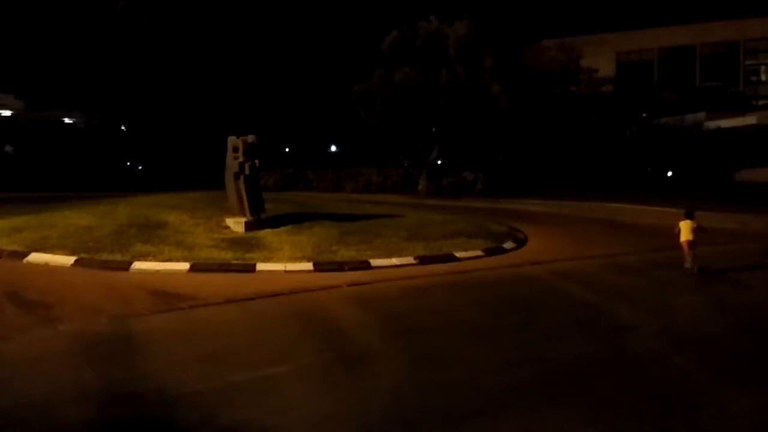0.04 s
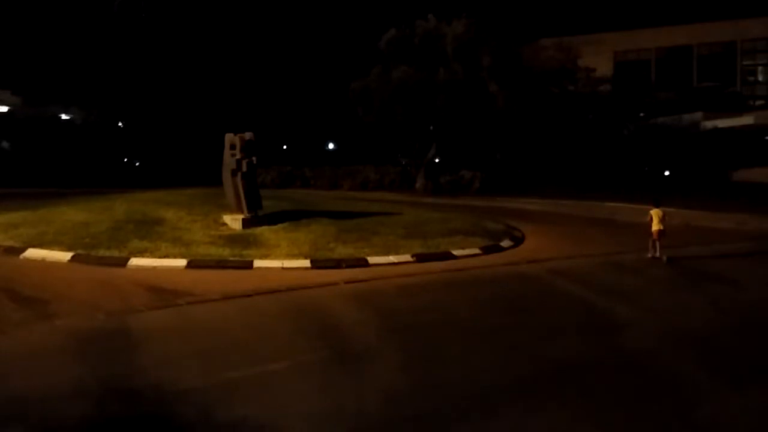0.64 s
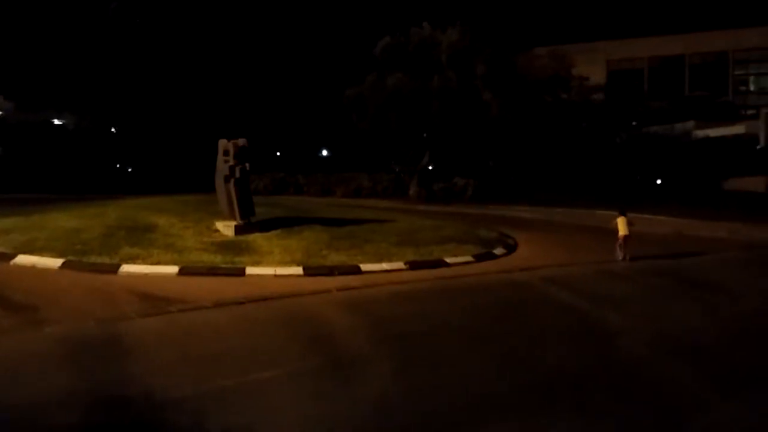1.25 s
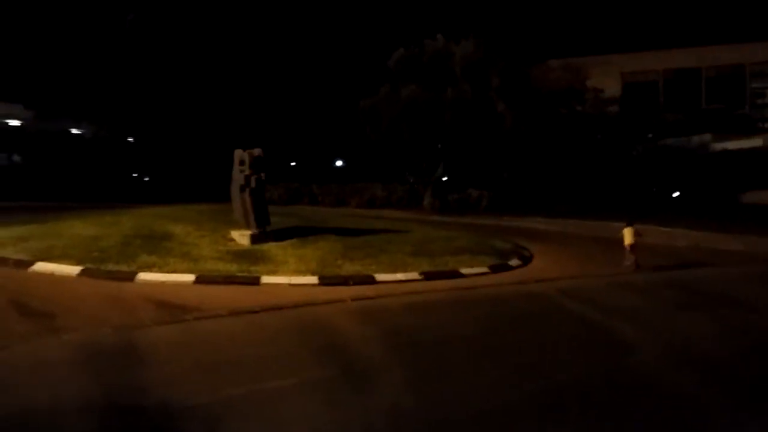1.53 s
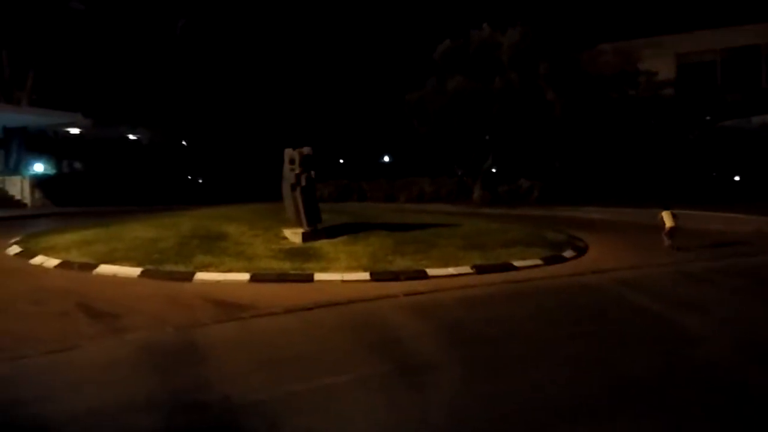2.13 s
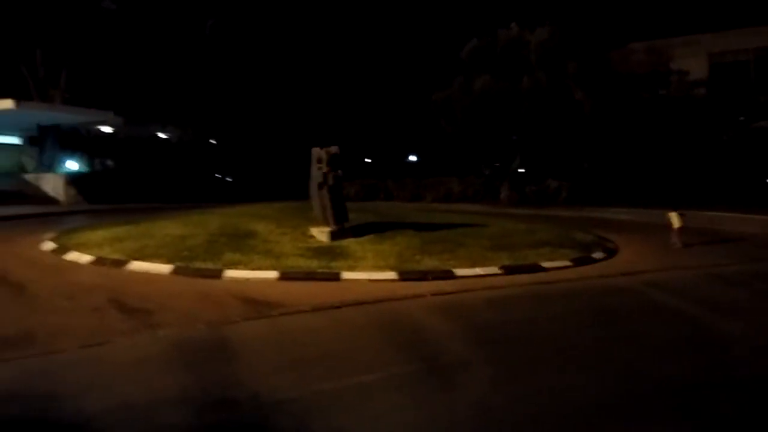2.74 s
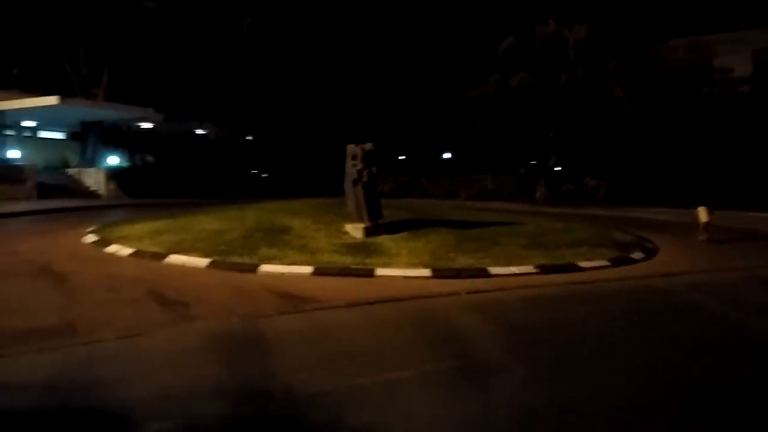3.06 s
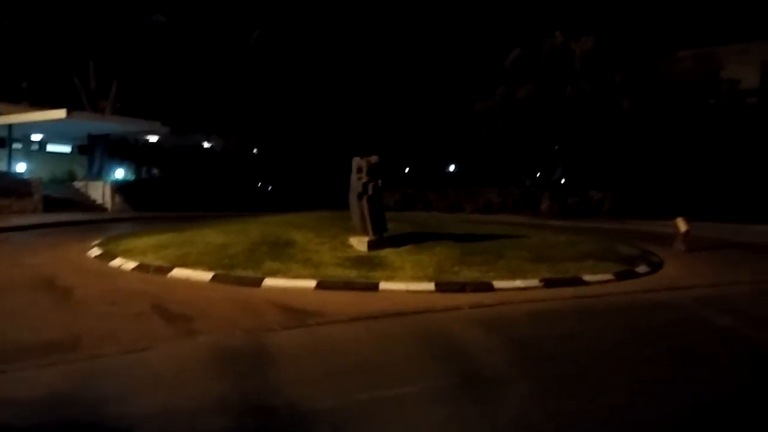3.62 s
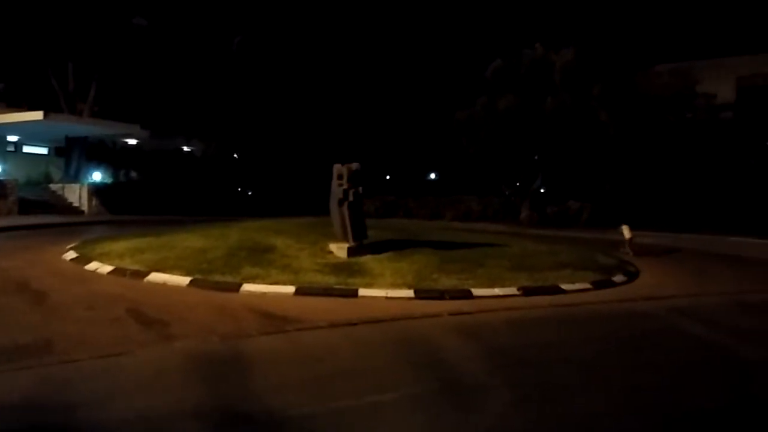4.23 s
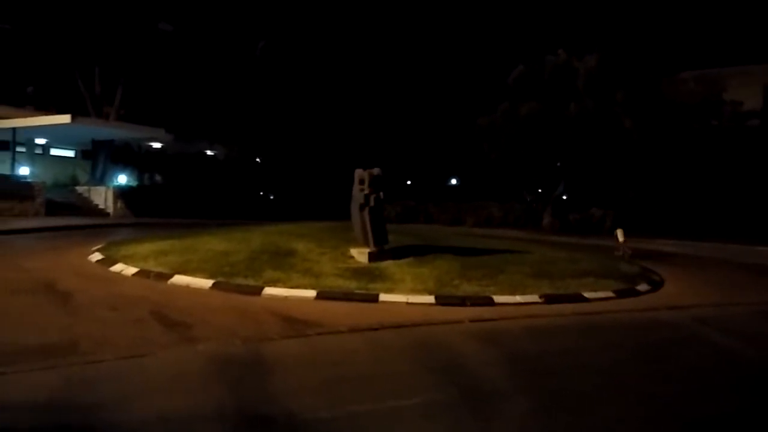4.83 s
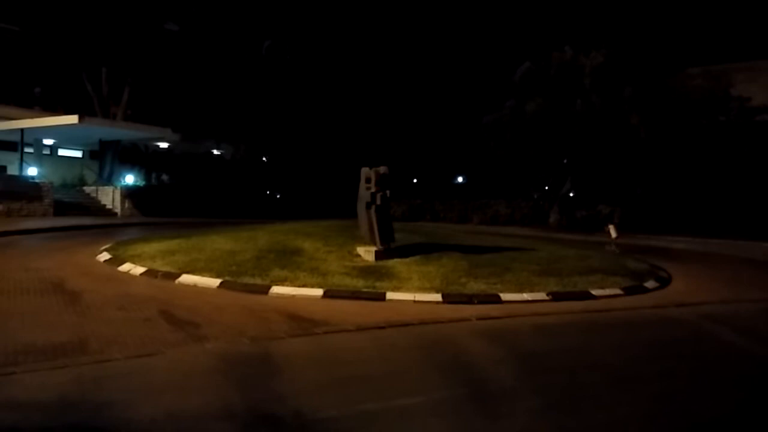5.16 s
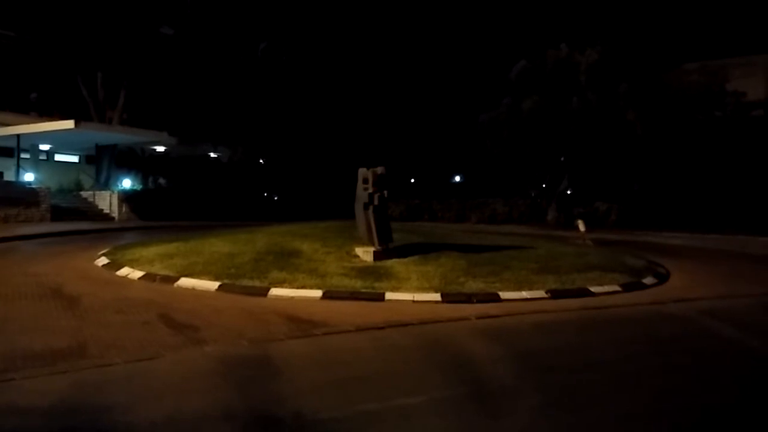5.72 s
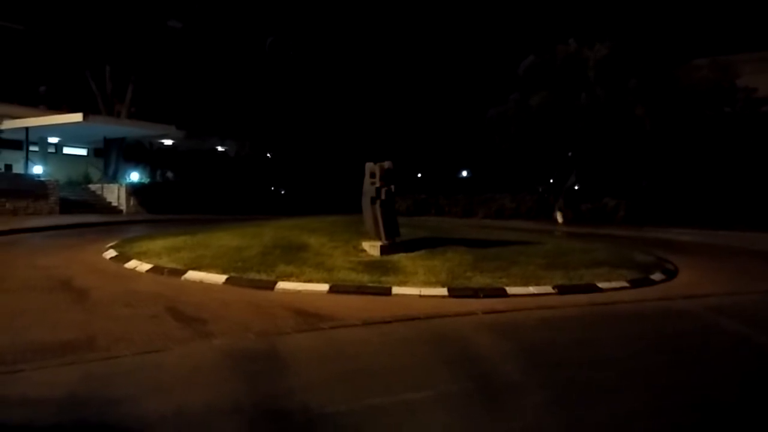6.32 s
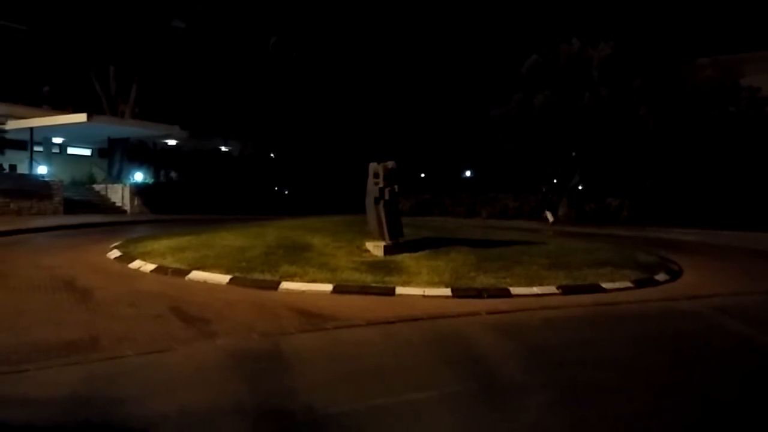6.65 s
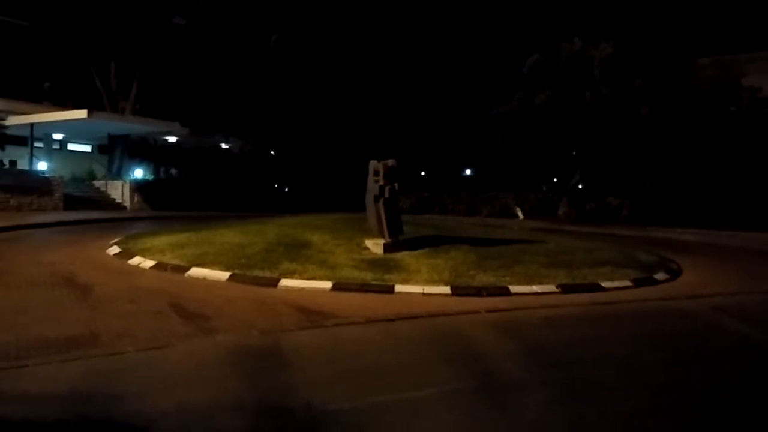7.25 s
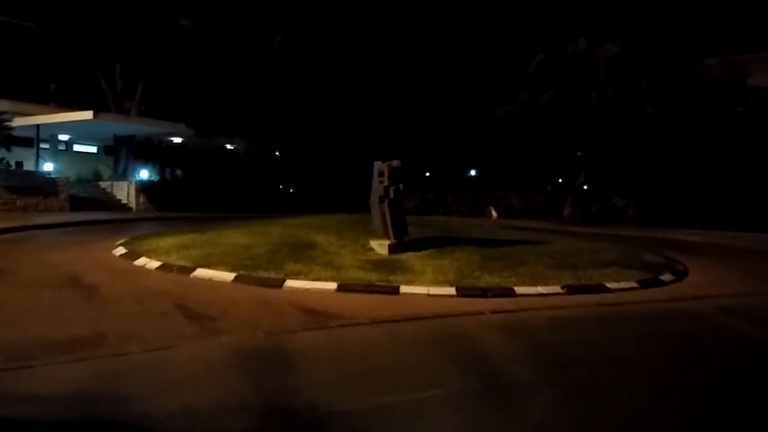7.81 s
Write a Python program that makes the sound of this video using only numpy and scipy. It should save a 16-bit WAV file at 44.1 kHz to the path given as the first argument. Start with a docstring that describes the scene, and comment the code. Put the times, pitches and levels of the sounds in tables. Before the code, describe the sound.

Fingers rub and slide on a plastic phone case right by the microphone, with ticks and creaks, over a distant town rumble.

```python
"""An empty roundabout at night, on a hand-held phone with two microphone ports.
Far off, the town rumbles, a building hums on mains harmonics and one motor winds down.
Now and then the bass swells briefly or gives a soft thud.
Right beside the left port, fingers shift on the case: skin slides in tiny slips, snags and lets go,
ringing the plastic shell, which creaks, ticks and clacks. The palm drags on the back."""
import sys
import numpy as np
from scipy import signal
from scipy.fft import rfft, irfft
from scipy.io import wavfile
from scipy.ndimage import map_coordinates

SR = 44100
rng = np.random.default_rng(int(sys.argv[2]) if len(sys.argv) > 2 else 0)


def transcribe(signal):
    """Save signal, clipped to [-1, 1], as a 16-bit WAV file at the path in sys.argv[1]."""
    frames = np.atleast_2d(signal).T
    limited = np.clip(frames, -1, 1)
    pcm = np.round(limited * 32767).astype(np.int16)
    wavfile.write(sys.argv[1], SR, pcm)


N = 356328
TIME = np.arange(N) / SR
FREQ = np.maximum(np.arange(N // 2 + 1) * SR / N, 1)

# Table levels are relative: each source adds its own gain.
# spectrum of the distant town: f/Hz, level/dB
TOWN_COLOUR = [(25, -33), (42, -9.5), (62, 4), (80, -2.5), (106, 7), (135, -2), (220, -7.5), (330, -3.5),
               (550, -10.5), (900, -14), (1400, -20), (3000, -19), (7000, -23.5), (14000, -32)]
# hum lines from the building: f/Hz, level/dB, waver/dB
HUM_LINES = [(100.6, -65.5, 2.8), (104.6, -64.5, 2.8), (150.5, -61, 1.9), (199.7, -59, 1.5),
             (302, -77.5, 4)]
# the far motor winding down: t/s, f/Hz, level/dB
MOTOR_RUNDOWN = [(7.1, 291.6, -100), (7.17, 288, -61), (7.22, 274, -53), (7.33, 251.5, -70),
                 (7.42, 251, -63), (7.57, 246, -62), (7.68, 218, -64), (7.78, 208, -100)]
# brief soft low swells, most near the 100 Hz hum, and a few low thuds: t/s, level/dB, f/Hz
LOW_SWELLS = [(.785, -44.5, 105), (2.17, -47, 104), (2.535, -45, 64.4), (2.86, -41.5, 100.3),
              (3.964, -41, 226), (4.5, -44, 104), (4.762, -47, 70.5), (5.04, -42, 103), (5.7, -44, 102),
              (7.081, -50, 100)]
# the palm drags on the back of the phone: t/s, length/s, level/dB
PALM_DRAGS = [(.617, 0.02, -57), (.85, 0.36, -56), (1.37, 0.11, -51.5), (1.56, 0.012, -53),
              (1.9, 0.2, -59.5), (2.33, 0.37, -57.5), (2.74, 0.42, -58.5), (3.28, 0.44, -60.5),
              (3.7, 0.14, -54), (4.2, 0.41, -66), (6.26, 0.14, -59)]
# spectrum of that drag: f/Hz, level/dB
DRAG_COLOUR = [(40, -53), (150, 7.5), (330, -14.5), (540, 6), (680, -1.5), (800, -6), (1000, 3),
               (1300, -12.5), (2500, -18)]
# a finger bumps the shell: t/s, level/dB, f/Hz, length/s
FINGER_BUMPS = [(0.931, -31, 477, 0.0047), (0.949, -42.5, 447, 0.037), (1.173, -42, 1040, 0.014),
                (1.427, -38, 460, 0.0098), (1.458, -28, 1100, 0.0087), (1.48, -30, 2120, 0.0092),
                (1.585, -43.5, 970, 0.028), (2.967, -41.5, 1300, 0.0075), (5.407, -45.5, 2220, 0.025),
                (7.49, -37, 1510, 0.006), (7.52, -51.5, 1440, 0.11), (7.894, -35.5, 1434, 0.0071)]
# creaks of the seam: t/s, level/dB, length/s
SEAM_CREAKS = [(1.452, -26, 0.0046), (5.023, -30.5, 0.0058), (5.038, -32.5, 0.037), (5.064, -29.5, 0.013),
               (5.402, -35.5, 0.03)]
# lone ticks of the seam: t/s, level/dB
SEAM_TICKS = [(1.458, -24), (5.0695, -13.5), (6.2562, -19.5), (6.808, -30), (6.899, -30)]
# the case springs back: t/s, level/dB, decay/s
CASE_CLACKS = [(7.494, -34, 0.0074), (7.897, -36.5, 0.013)]
# modes rung by a clack: f/Hz, level/dB, share of the decay, left over right/dB
CASE_MODES = [(1450, -8, 0.5, 5), (2248, -8, .4, 2), (3980, -9, 0.4, 12), (4640, -5, 1.0, 15),
              (5820, 3.5, 0.75, 17), (7400, -9, .3, 14), (8950, -6, .3, 12)]
# spectrum of the pressed shell: f/Hz, level/dB
SHELL_COLOUR = [(40, -32), (200, 3.5), (400, -10.5), (560, 1), (780, -12.5), (1000, 3.5), (1280, -5),
                (1600, 6.5), (1950, 1), (2350, 11.5), (2750, 8), (3050, -23), (3500, -6), (5000, -1.5)]
# resonance of the hollow under the fingers: t/s, f/Hz, level/dB
FINGER_HOLLOW = [(1.3, 2328, -7.5), (2.2, 3487, -6), (3.1, 3410, -2), (4.15, 3014, -3), (4.7, 3600, -14),
                 (7.9, 695, -17), (7.95, 1003, 1), (7.975, 2300, -0.5), (8.07, 2590, -13)]
# the skin catches and sings: t/s, level/dB, f/Hz, length/s, left over right/dB
SKIN_CHIRPS = [(0.724, -34, 4350, 0.005, 18), (0.734, -32, 4470, 0.008, 18), (0.785, -30, 5000, 0.0081, 18),
               (1.044, -53.5, 544, 0.1, 0.5), (2.823, -46, 4220, 0.0083, 12),
               (2.843, -43.5, 4930, 0.022, 16), (4.761, -45, 4950, 0.028, 12),
               (6.043, -51, 5300, 0.035, 20), (7.918, -49, 5830, 0.074, 26)]
# the skin snags and lets go: t/s, level/dB, length/s, favoured f/Hz
SKIN_SNAGS = [(.618, -34, 0.0047, 4600), (0.657, -36, .0057, 4800), (.669, -33, .007, 4700),
              (.68, -21, 0.0048, 4700), (0.709, -29, .005, 7200), (.721, -24, .004, 4400),
              (0.733, -20.5, 0.0079, 4900), (0.752, -21, .007, 4870), (0.762, -23, 0.0084, 4750),
              (0.776, -19, 0.0075, 4700), (0.8, -30, 0.0045, 4500), (.819, -41, .003, 5600),
              (0.837, -27, .0054, 5500), (0.857, -29.5, .005, 5800), (.881, -28, .004, 4900),
              (0.908, -23.5, 0.0048, 5650), (.941, -28.5, 0.0084, 5300), (1.006, -26, 0.0053, 5500),
              (1.053, -31, .006, 3280), (1.084, -32.5, .0087, 5600), (1.096, -29, .003, 5700),
              (1.111, -35, .003, 5500), (1.13, -32, .003, 5700), (1.145, -31, 0.0051, 5800),
              (1.179, -24, 0.011, 5200), (1.225, -31, .0043, 5700), (1.249, -33, .004, 5900),
              (1.334, -30, 0.0049, 5770), (1.383, -34, .004, 4300), (1.395, -26.5, .012, 5400),
              (1.434, -28, 0.01, 6200), (1.458, -12.5, 0.0093, 9100), (1.584, -32, 0.019, 5300),
              (1.605, -32, 0.0043, 5700), (1.671, -37, 0.0056, 5600), (1.883, -37, .003, 8800),
              (1.937, -41, .0027, 6200), (2.012, -29.5, 0.0055, 4660), (2.074, -27.5, 0.0094, 8950),
              (2.273, -40, .005, 6200), (2.355, -33, 0.0054, 5800), (2.408, -40, .005, 8000),
              (2.42, -26.5, 0.0071, 4400), (2.443, -39, .0045, 7000), (2.536, -21.5, 0.0058, 5350),
              (2.56, -25.5, 0.0042, 3500), (2.722, -35, .004, 4900), (2.967, -34, .0046, 5170),
              (2.993, -29, 0.013, 5000), (3.018, -42, .004, 4300), (3.063, -33, 0.011, 6000),
              (3.094, -35, 0.011, 6000), (3.118, -34, .003, 4300), (3.288, -34.5, .008, 4470),
              (3.313, -34, 0.0059, 5800), (3.364, -30.5, 0.01, 4510), (3.5, -40, .0054, 5600),
              (3.651, -33.5, 0.0057, 5600), (3.671, -40, .004, 5600), (3.761, -33, 0.0037, 4830),
              (3.783, -36, .005, 5600), (3.977, -33, 0.0072, 5700), (3.999, -31, 0.0071, 5300),
              (4.075, -27.5, 0.0061, 3860), (4.085, -32, 0.0045, 4100), (4.098, -30.5, 0.0085, 4600),
              (4.125, -41, .008, 4600), (4.148, -35, 0.0043, 5200), (4.172, -34, 0.0044, 5300),
              (4.21, -40.5, .004, 3400), (4.48, -39, .0064, 5600), (4.512, -33, .006, 5400),
              (4.526, -31, 0.0054, 5230), (4.759, -33, 0.0055, 4900), (5.113, -33, 0.0084, 8500),
              (5.15, -39.5, .0067, 8500), (7.185, -40, .007, 5600), (7.269, -39, 0.0053, 5630),
              (7.492, -30, 0.0057, 5200), (7.51, -37, .003, 5000), (7.896, -33.5, .006, 7500)]
# a finger slides over the case: t/s, length/s, scrape level/dB, rub level/dB
FINGER_STROKES = [(.617, 0.0077, -49, -50.5), (.66, 0.082, -41, -46.5), (.73, 0.036, -33, -43),
                  (.81, 0.17, -39.5, -50.5), (1.03, 0.21, -39.5, -50.5), (1.335, 0.26, -40.5, -52.5),
                  (1.46, 0.011, -35.5, -44), (1.55, 0.12, -43, -53.5), (1.67, 0.19, -49.5, -63),
                  (1.86, 0.18, -46, -60), (2.015, 0.15, -41.5, -54.5), (2.19, 0.076, -50, -63),
                  (2.33, 0.13, -44.5, -58), (2.425, 0.12, -44.5, -54), (2.535, 0.017, -39, -42.5),
                  (2.62, 0.17, -45, -56.5), (2.82, 0.25, -53.5, -54.5), (2.985, 0.11, -39.5, -50.5),
                  (3.14, 0.085, -53, -63.5), (3.29, 0.1, -44, -52.5), (3.43, 0.28, -44, -56.5),
                  (3.75, 0.013, -41, -55), (3.82, 0.24, -50, -56.5), (3.94, 0.073, -44.5, -50),
                  (4.075, 0.14, -46.5, -56), (4.25, 0.016, -45, -53.5), (4.41, 0.058, -51, -62),
                  (4.485, 0.074, -43.5, -65), (4.585, 0.019, -44, -70), (4.76, 0.025, -45.5, -67),
                  (4.84, 0.25, -49.5, -59.5), (5.11, 0.071, -46.5, -61), (5.403, 0.034, -52, -52),
                  (5.46, 0.32, -53.5, -66.5), (5.87, 0.36, -52, -70), (6.25, 0.23, -51, -61),
                  (6.9, 0.053, -52.5, -64), (6.96, 0.33, -49, -55.5), (7.19, 0.036, -43.5, -51),
                  (7.493, 0.083, -40.5, -55), (7.897, 0.083, -43.5, -53)]
# spectrum of the scrape at the near, left port: f/Hz, level/dB
LEFT_PORT_COLOUR = [(1500, -25.5), (3000, -9.5), (3900, -3), (4600, -2.5), (5600, 1), (6300, -2),
                    (7600, -2), (8900, 2), (9900, -9), (12000, -8.5), (13800, -13)]
# and at the far, right port: f/Hz, level/dB
RIGHT_PORT_COLOUR = [(1500, -17.5), (3200, -9.5), (4200, -10), (5600, -13.5), (6600, -13.5), (9500, -25),
                     (12000, -11), (13800, -21)]
# narrow resonances of the case: f/Hz, width/Hz, level/dB
CASE_RESONANCES = [(2750, 31, 10), (3380, 40, 4.5), (4390, 32, -3), (4520, 50, 2.5), (4570, 100, -8),
                   (4887, 103, 3.5), (5150, 50, -1), (5330, 94, 1.5), (5590, 40, 0.5), (5780, 220, -1.5),
                   (6280, 40, 6), (6820, 35, 8), (7170, 21, 2), (7500, 37, 4)]
# the scrape's treble above 10 kHz: t/s, level/dB
SCRAPE_TREBLE = [(.65, -3), (1.3, 2.5), (1.55, -0.5), (2.05, 2), (2.55, -5), (3.1, -8), (3.35, 4.5),
                 (4.1, -6.5), (4.55, 1), (6.3, 1), (7.5, -4)]


def undb(db):
    """Decibels to gain."""
    return 10 ** (np.asarray(db) / 20)


def unit(x):
    """Scale to rms 1."""
    return x / np.sqrt(np.mean(x ** 2))


def curves(rows):
    """The columns of a table, joined by straight lines in time."""
    times, *columns = np.transpose(rows)
    return [np.interp(TIME, times, column) for column in columns]


def walk(rate):
    """Random drift with a spread near 1, turning `rate` times a second."""
    knots = rng.standard_normal(4096)
    return np.sqrt(2) * np.interp(TIME * rate, np.arange(len(knots)), knots)


def colour(points):
    """Causal, minimum-phase response through points of f/Hz, level/dB."""
    hz, db = np.transpose(points)
    cepstrum = irfft(np.log(undb(np.interp(np.log(FREQ), np.log(hz), db))), N)
    cepstrum[1:N // 2] *= 2
    cepstrum[N // 2 + 1:] = 0
    return np.exp(rfft(cepstrum))


def resonance(hz, width):
    """Response of one resonance, gain 1 at its centre."""
    return 1 / (1 + 1j * (FREQ ** 2 - hz ** 2) / (FREQ * width))


def through(x, response):
    """Filter by a response, keeping the power of white noise."""
    return irfft(rfft(x) * response / np.sqrt(np.mean(np.abs(response) ** 2)), N)


def ports(left_db):
    """Gains of the two ports for a sound that is louder on the left."""
    return undb([[0], [-left_db]])


def burst(start, length, rise_s=.0006, tail_db=-22, tail_s=.077):
    """Envelope of one release: a quick rise, a short run, a weak tail."""
    out = np.zeros(N)
    first = int(start * SR)
    age = TIME[:min(SR // 4, N - first)]
    rise = 1 - np.exp(-age / rise_s)
    fall = np.exp(-(age / length) ** 3) + undb(tail_db) * np.exp(-age / tail_s)
    out[first:first + len(age)] = rise * fall
    return out


def gesture(start, length, attack_s, release_s, sag_db_per_s=0):
    """Envelope: attack, a hold that may sag, release."""
    age = np.maximum(TIME - start, 0)
    attack = 1 - np.exp(-age / attack_s)
    release = np.exp(-np.maximum(age - length, 0) / release_s)
    return attack * undb(-sag_db_per_s * age) * release


def sliding_db(rows, *rest_db):
    """A dB curve per level column: slides start fast, lose speed and die back to a resting creep."""
    power = undb(rest_db)[:, None] ** 2
    for start, length, *db in rows:
        slide = gesture(start, length, attack_s=.0018, release_s=.044, sag_db_per_s=10)
        power = power + np.outer(undb(db), slide) ** 2
    return 10 * np.log10(power)


def slips(rate, spread_db, share=.37, lag_s=.000227):
    """Tiny uneven slips, `rate` a second; a share of each reaches the right port just after the left."""
    happens = rng.random(N) < rate / SR
    size = undb(spread_db * np.minimum(rng.exponential(size=N), 4))
    left, right_only = happens * size * rng.standard_normal((2, N))
    late = np.interp(TIME - lag_s, TIME, left)
    right = share * late + np.sqrt(1 - share ** 2) * right_only
    return unit(np.array([left, right]))


def shifting_gaps(x, depth_db, rate, band_hz):
    """Gaps between skin and case change shape: narrow bands swell and sink on their own."""
    hz, times, spectra = signal.stft(x, SR, nperseg=256)
    field = rng.standard_normal((512, 512))
    grid = np.meshgrid(hz / band_hz, times * rate, indexing="ij")
    swell = map_coordinates(field, grid, order=1, mode="wrap")
    return signal.istft(spectra * undb(depth_db * swell), SR, nperseg=256)[1][..., :N]


def town(level_db=-56, wide_hz=800, throb_db=2, throb_hz=130, waver_db=1.3):
    """Far traffic, an even wash under faint hiss; the bass throbs in the centre, the treble is wide."""
    mid, side = rfft(rng.standard_normal((2, N)))
    apart = FREQ / np.hypot(FREQ, wide_hz)
    noise = irfft(mid * np.sqrt(2 - apart ** 2) + side * apart * np.array([[1], [-1]]), N)
    wash = unit(through(noise, colour(TOWN_COLOUR)))
    bass = irfft(rfft(wash) / (1 + (FREQ / throb_hz) ** 6), N)
    gain = undb(level_db + waver_db * walk(13))
    return (wash - bass + bass * undb(throb_db * walk(18))) * gain


def mains_hum(drift_rad=.72, flutter_rad=.25):
    """A building hums on mains harmonics, a motor line beating beside them; the air makes each flutter."""
    out = np.zeros(N)
    for hz, db, waver_db in HUM_LINES:
        rms = undb(db + waver_db * walk(16))
        phase = 2 * np.pi * hz * TIME + drift_rad * walk(7) + flutter_rad * walk(35)
        out += np.sqrt(2) * rms * np.sin(phase)
    return out


def far_motor(octave_db=-13, waver_db=2, wander=.0068):
    """A far motor, a low tone and its weak octave, falls in two steps towards idle."""
    hz, db = curves(MOTOR_RUNDOWN)
    phase = 2 * np.pi * np.cumsum(hz * (1 + wander * walk(60))) / SR
    return undb(db + waver_db * walk(25)) * (np.sin(phase) + undb(octave_db) * np.sin(2 * phase))


def low_swells(gain_db=-1, attack_s=.012, decay_s=.03):
    """Brief soft low swells, most near the 100 Hz hum, and a few low thuds, alike at both ports."""
    out = np.zeros(N)
    for start, db, hz in LOW_SWELLS:
        envelope = gesture(start, 2 * attack_s, attack_s, decay_s)
        out += undb(db + gain_db) * envelope * np.sin(2 * np.pi * hz * (TIME - start))
    return out


def palm(rest_db=-73, jerk_db=2):
    """Behind the microphone, coarse slips of the palm thrum in the body of the phone."""
    thrum = through(slips(1200, 1.6), colour(DRAG_COLOUR))
    thrum = shifting_gaps(thrum, depth_db=4, rate=17, band_hz=160)
    return thrum * ports(.34) * undb(sliding_db(PALM_DRAGS, rest_db) + jerk_db * walk(35))


def bumps(gain_db=-10):
    """Soft finger contacts, each thudding in a heavily damped part of the shell."""
    grains = slips(4000, .66)
    grains = unit(grains + .5 * grains[::-1])  # each port also hears the other's slips
    return sum(undb(db + gain_db) * through(grains * burst(start, length), resonance(hz, hz) ** 2)
               for start, db, hz, length in FINGER_BUMPS)


def seam(creak_db=-7, tick_db=7, knock_db=-11, edge_db=-9):
    """Close on the left, the plastic seam creaks and ticks: a short high ring, a knock, a bright edge."""
    creaks = sum(undb(db + creak_db) * burst(start, length) for start, db, length in SEAM_CREAKS)
    push = slips(3500, .66) * creaks
    for start, db in SEAM_TICKS:
        push[:, int(start * SR)] += undb(db + tick_db)
    ring = resonance(8700, 2900) ** 2
    knock = undb(knock_db) * resonance(2840, 500)
    edge = undb(edge_db) * resonance(13900, 2300)
    return through(push, ring + knock + edge) * ports(12)


def clacks(attack_s=.0008):
    """The case springs back against the phone and its modes ring out briefly."""
    out = np.zeros((2, N))
    age = TIME[:SR // 8]
    attack = 1 - np.exp(-age / attack_s)
    for start, db, decay_s in CASE_CLACKS:
        first = int(start * SR)
        for hz, mode_db, decay_share, left_db in CASE_MODES:
            envelope = attack * np.exp(-age / (decay_s * decay_share))
            ring = envelope * np.sin(2 * np.pi * (hz * age + rng.random()))
            out[:, first:first + len(age)] += ports(left_db) * undb(db + mode_db) * ring
    return out


def rub(rub_db, jerk_db=2, hollow_db=-2, hollow_width_hz=600, wander=.05):
    """The pressed shell passes coarse slips to both ports and stirs the hollow under the fingers."""
    hz, share_db = curves(FINGER_HOLLOW)
    phase = 2 * np.pi * np.cumsum(hz * (1 + wander * walk(14))) / SR
    shell = through(slips(1500, .37), colour(SHELL_COLOUR))
    shell = shifting_gaps(shell, depth_db=4, rate=11, band_hz=207.8)
    flutter = through(slips(4000, .98), 1 / (1 + (2 * FREQ / hollow_width_hz) ** 2))
    hollow = np.sqrt(2) * flutter * np.sin(phase) * undb(share_db + hollow_db)
    return (shell + hollow) * undb(rub_db + jerk_db * walk(70))


def chirps(width_hz=150):
    """A catching fingertip drives one narrow resonance."""
    grains = slips(5500, 1.4)
    return sum(ports(left_db) * undb(db) * through(grains * burst(start, length), resonance(hz, width_hz))
               for start, db, hz, length, left_db in SKIN_CHIRPS)


def cracks(gain_db=-11, hardness=1.8, ring_hz=12500, width_hz=5000):
    """The harder a snag, the stronger its bright edge, which grows faster than the snag itself."""
    grains = slips(9000, .5)
    releases = sum(undb(hardness * db + gain_db) * burst(start, length)
                   for start, db, length, _ in SKIN_SNAGS)
    return through(grains * releases, resonance(ring_hz, width_hz) ** 2) * ports(4.9)


def snags(ring_db=5, width_hz=1500):
    """Each snag lets go in a burst of slips that favours its own pitch, set by where the finger sits."""
    out = np.zeros((2, N))
    grains = slips(20000, .3)
    for start, db, length, hz in SKIN_SNAGS:
        span = slice(int(start * SR), int(start * SR) + SR // 4)
        push = undb(db) * grains[:, span] * burst(start, length)[span]
        ring = signal.lfilter(*signal.iirpeak(hz, hz / width_hz, fs=SR), push)
        out[:, span] += push + undb(ring_db) * ring
    return out


def stick_slip(rate=48, jump=.45, relax_s=.009):
    """Gain of a slide: at uneven gaps the skin jumps ahead and settles within milliseconds."""
    gaps, sizes = rng.random((2048, 2)).T
    starts = np.cumsum((.5 + gaps) / rate)
    last = np.searchsorted(starts, TIME)
    age = TIME - np.append(0, starts)[last]
    return unit(1 + jump * (.5 + sizes[last]) * np.exp(-(age / relax_s) ** 2))


def scrape(scrape_db, slide_db=-5, snag_db=-12.5, jerk_db=.87, medium_touch_db=-39.5, half_ring_db=-55.5):
    """Right at the left port, skin slides in jerks and snags; every slip rings the case and the ports."""
    sliding = slips(10000, .5) * stick_slip() * undb(scrape_db + slide_db + jerk_db * walk(90))
    snagging = undb(snag_db) * snags()
    port_colours = np.array([colour(LEFT_PORT_COLOUR), colour(RIGHT_PORT_COLOUR)])
    spectrum = rfft(through(sliding + snagging, port_colours))
    # the place of the finger decides how strongly each resonance is fed
    ringing = sum(irfft(spectrum * resonance(hz, width), N) * undb(db + 2 * walk(6.1))
                  for hz, width, db in CASE_RESONANCES)
    # a lighter touch leaves more of the finest slips, above 7 kHz
    fine_band = FREQ ** 8 / (FREQ ** 8 + 7000. ** 8)
    fine_gain = undb(.3665 * (medium_touch_db - scrape_db))
    direct = irfft(spectrum * (1 - fine_band), N) + irfft(spectrum * fine_band, N) * fine_gain
    treble_band = FREQ ** 16 / (FREQ ** 16 + 10000. ** 16)
    treble_gain = undb(curves(SCRAPE_TREBLE)[0])
    direct += irfft(rfft(direct) * treble_band, N) * (treble_gain - 1)
    contact = 1 / (1 + undb(half_ring_db - scrape_db))  # resting fingers barely stir the resonances
    shell = undb(-19) * through(snagging, colour(SHELL_COLOUR))
    return shifting_gaps(.79 * (direct + contact * ringing) + shell, depth_db=3.5, rate=22, band_hz=258.1)


def scene(creep_scrape_db=-59, creep_rub_db=-66.5, shade_db=-4.5):
    """The hand on the case, close up, in front of the distant town."""
    scrape_db, rub_db = sliding_db(FINGER_STROKES, creep_scrape_db, creep_rub_db)
    hand = scrape(scrape_db) + cracks() + rub(rub_db) + palm() + bumps() + chirps()
    case = clacks() + seam()
    # the hand covers the ports for a moment and shades the town and the hum
    covered = gesture(start=.85, length=1.23, attack_s=.15, release_s=.15)
    background = (town() + mains_hum()) * undb(shade_db * covered) + far_motor() + low_swells()
    return background + case + hand


def record(dry, open_s=.617, top_hz=14350):
    """The microphone opens after a moment of silence; the top is cut steeply."""
    lowpass = signal.ellip(10, .2, 70, top_hz, fs=SR, output="sos")
    return signal.sosfilt(lowpass, dry * (TIME >= open_s))


dry = scene()
out = record(dry)
transcribe(out)
```